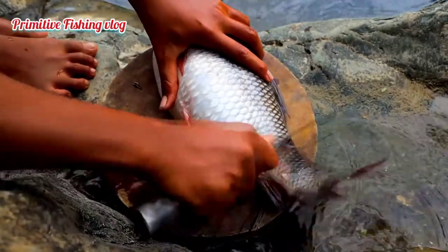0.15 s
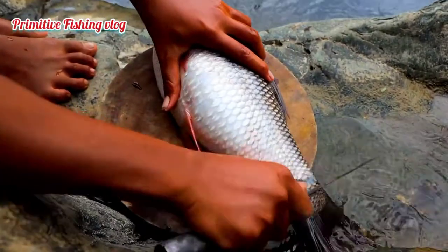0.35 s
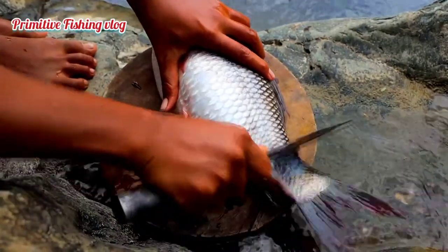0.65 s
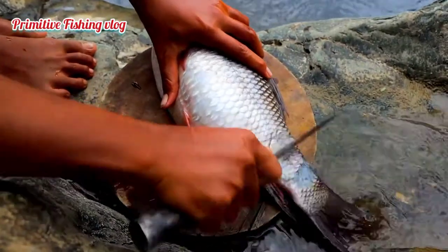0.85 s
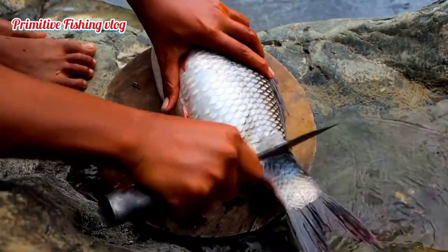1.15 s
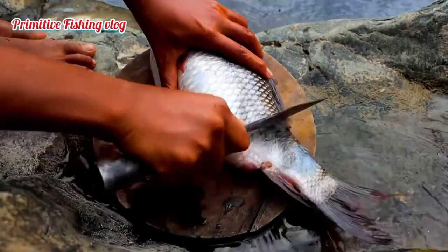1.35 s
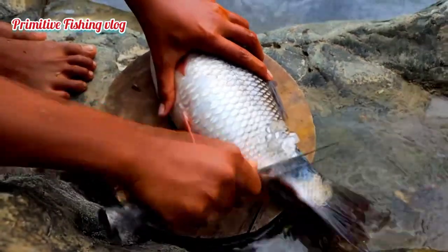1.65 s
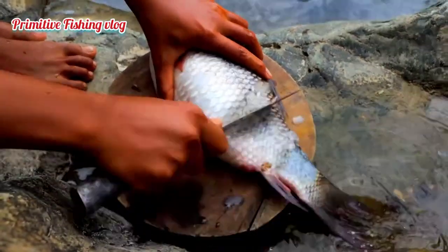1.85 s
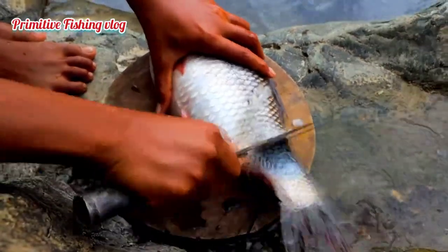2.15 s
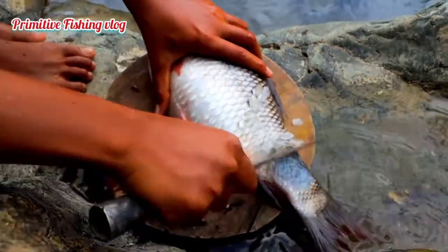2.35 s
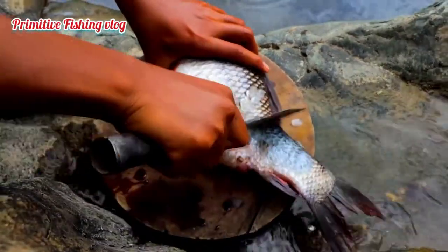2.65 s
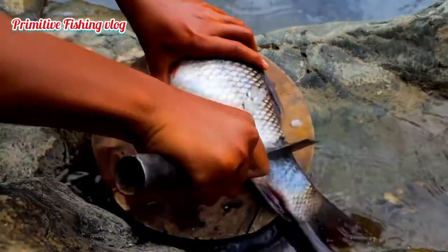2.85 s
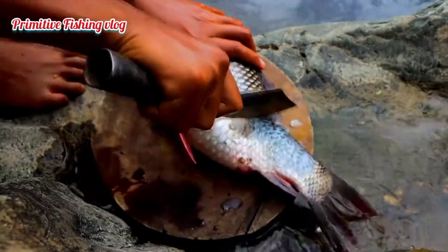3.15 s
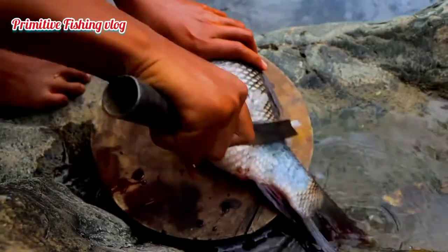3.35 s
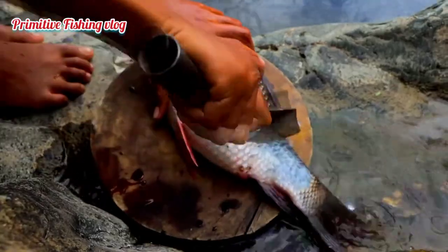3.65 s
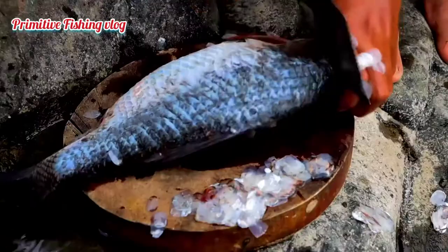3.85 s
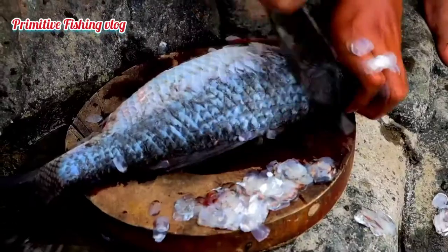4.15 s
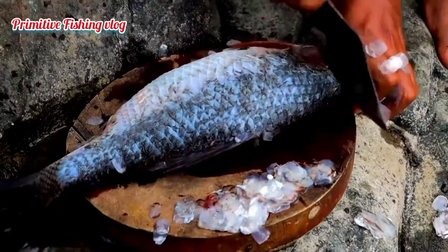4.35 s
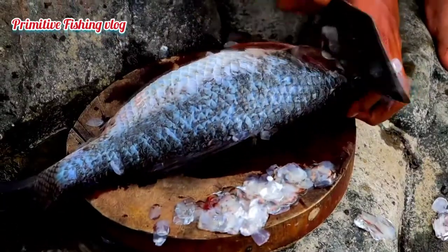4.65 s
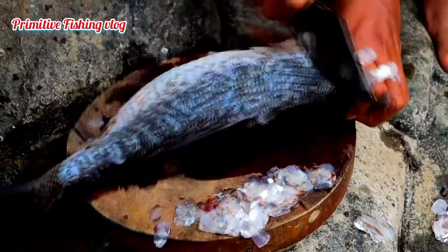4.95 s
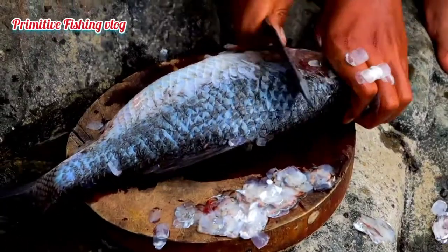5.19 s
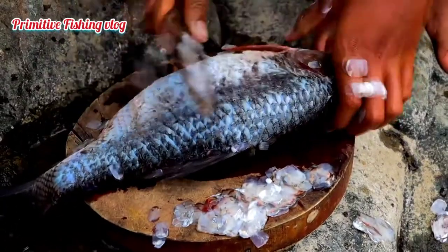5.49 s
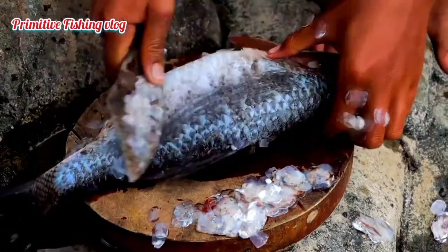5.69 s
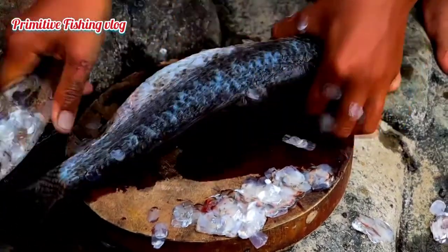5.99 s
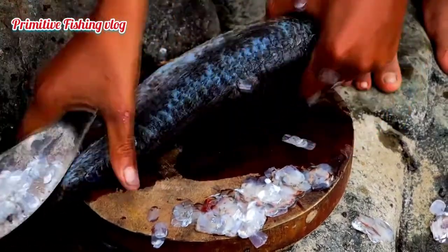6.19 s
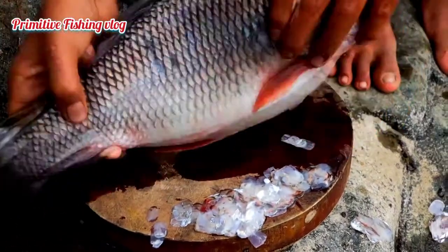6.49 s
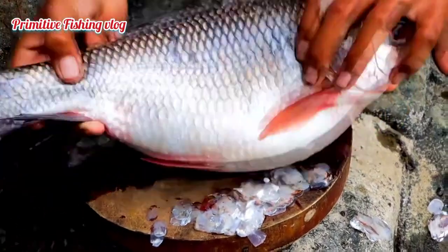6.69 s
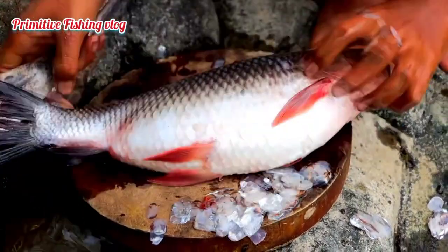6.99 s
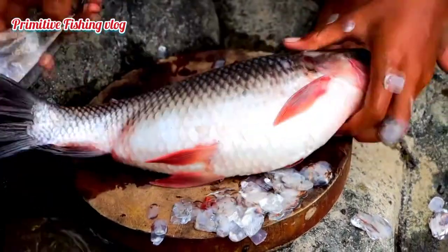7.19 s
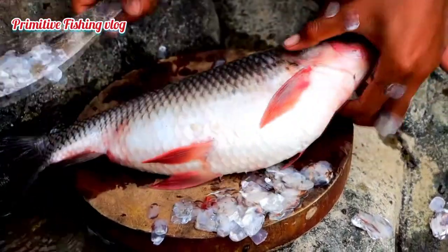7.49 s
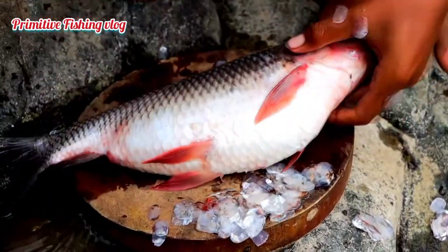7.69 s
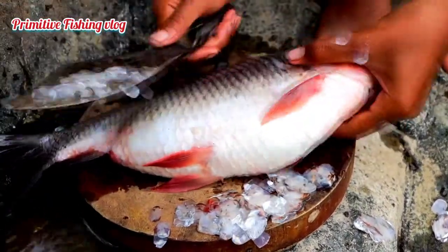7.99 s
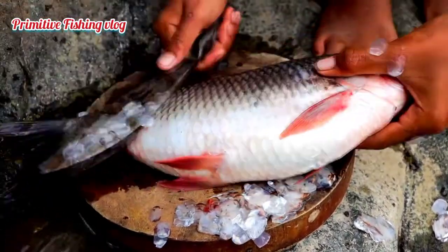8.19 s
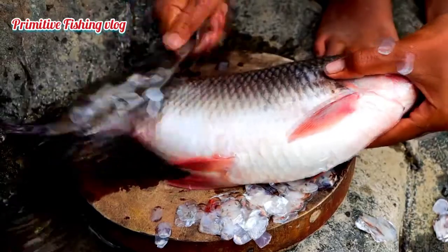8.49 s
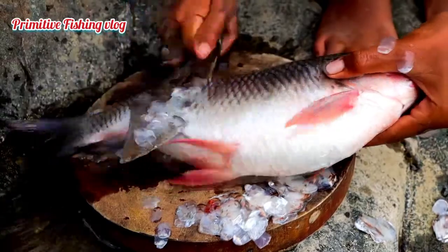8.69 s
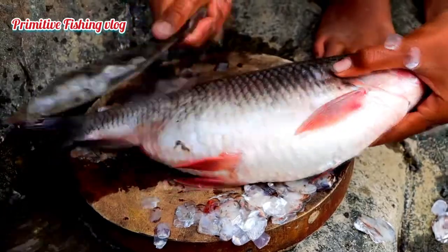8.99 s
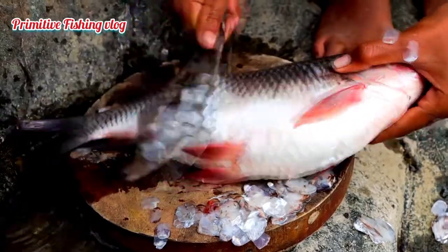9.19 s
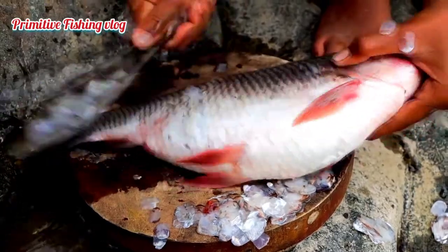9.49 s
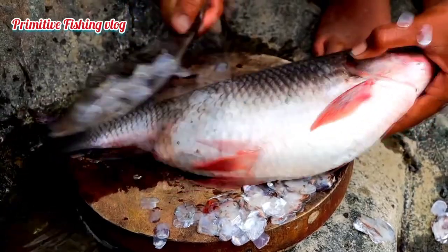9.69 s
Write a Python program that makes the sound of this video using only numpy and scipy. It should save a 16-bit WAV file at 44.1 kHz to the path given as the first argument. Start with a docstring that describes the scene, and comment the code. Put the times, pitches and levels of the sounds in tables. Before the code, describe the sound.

Close to the microphone, a knife scrapes a wet fish on a wooden board outdoors: brief, gritty, irregular rasps with a faint steely ring, crisp scale snaps and occasional hard clacks. Scraping stops around five seconds, leaving birdsong and stream, with small knocks near seven. A loud crack restarts the work after eight seconds. A distant bird whistles with echo; soft wind rumbles early on.

```python
"""Outdoors by a stream, a steel cleaver scrapes the scales off a large fish on a wooden board.
The edge rubs over wet skin (clumpy noise that also sets the steel ringing), scales snap loose (short
noise bursts), the blade knocks and rings (noise cracks and fading sines). Two birds sing gliding whistles,
one among echoing trees, one close by; water murmurs and wind buffets the microphone (shaped noise, bubbles).
Practically mono, with slight treble width added."""
import sys
import numpy as np
from scipy import signal
from scipy.fft import rfft, irfft, next_fast_len
from scipy.io import wavfile
from scipy.ndimage import uniform_filter1d, map_coordinates

SR = 44100
rng = np.random.default_rng(int(sys.argv[2]) if len(sys.argv) > 2 else 0)


def dump(signal):
    """Clip the signal to [-1, 1] and save it as 16-bit WAV at the path in sys.argv[1]."""
    limited = np.clip(np.atleast_2d(signal).T, -1, 1)
    pcm = np.round(limited * 32767).astype(np.int16)
    wavfile.write(sys.argv[1], SR, pcm)


N = 433944  # length of the scene in samples


def amp(db):
    """Turns decibels into a plain multiplier."""
    return 10 ** (np.asarray(db) / 20)


def unit(x):
    """Scales a sound to an rms of 1."""
    return x / np.sqrt(np.mean(x ** 2) + 1e-20)


def along(points, hz):
    """Reads a curve of (frequency [Hz], value) points on a log frequency axis."""
    f, v = np.transpose(points)
    return np.interp(np.log(hz + 1), np.log(f + 1), v)


def curves(rows):
    """One value per sample for each column after the time."""
    s, *cols = np.transpose(rows)
    return [np.interp(np.arange(N) / SR, s, c) for c in cols]


def wobble(rate):
    """A smooth random curve through `rate` random points a second."""
    points = rng.standard_normal(int(N * rate / SR) + 4)
    return map_coordinates(points, [np.arange(N) * rate / SR])


def filtered(x, response):
    """Multiplies the spectrum of x by a response, given as a function of frequency."""
    m = next_fast_len(N + SR // 2)
    return irfft(rfft(x, m) * response(np.fft.rfftfreq(m, 1 / SR)), m)[..., :N]


def coloured(x, spectrum):
    """Shapes x by a (frequency [Hz], level [dB]) spectrum, scaled so that white noise keeps its rms."""
    power_gain = amp(2 * along(spectrum, np.linspace(0, SR / 2, num=4096)))
    norm = np.sqrt(np.mean(power_gain))
    return filtered(x, lambda hz: amp(along(spectrum, hz)) / norm)


def add(track, s, sound):
    """Mixes a sound into a track at a time in seconds."""
    part = track[max(round(s * SR), 0):][:len(sound)]
    part += sound[:len(part)]


def tail(t60, late_t60, late_db):
    """A randomly drawn echo tail: a quick, lumpy part and a long part at its own level."""
    t = np.arange(SR // 3) / SR
    lumps = amp(5 * np.interp(t * 150, np.arange(60), rng.standard_normal(60)))
    quick, late = lumps * amp(-60 * t / t60), amp(late_db - 60 * t / late_t60)
    out = (quick + late) * rng.standard_normal(len(t))
    return out / np.linalg.norm(out)


# Strokes of the edge over the skin, levels before the rasp and steel are shaped and mixed:
# (time [s], nominal length [s], level [dB], how much it rings the steel [0-1])
STROKES = [(0.1, .03, -45, 1), (0.191, 0.04, -43.5, .3), (.228, 0.018, -34.5, 0.7), (0.352, 0.047, -46, 1),
           (0.491, 0.038, -43.5, 1), (.65, .1, -56, .2), (.764, 0.046, -44.5, .5), (0.941, 0.037, -47.5, 1),
           (1.015, 0.097, -55.5, 0.6), (1.314, .054, -50.5, .1), (1.368, .036, -50, 0.26),
           (1.393, 0.02, -35.5, 0.26), (1.573, .056, -56, .5), (1.7, .03, -53, .3), (1.733, 0.05, -53, 0.2),
           (1.773, 0.062, -45.5, .1), (1.836, 0.043, -36.5, 0.62), (1.974, .068, -49, .6),
           (2.102, .024, -44, 1), (2.13, 0.1, -54.5, 0.55), (2.292, .041, -46, 0.3),
           (2.563, .036, -47.5, 0.5), (2.587, 0.067, -56, .1), (2.683, 0.084, -50.5, 0),
           (2.877, 0.025, -51.5, .4), (3.015, 0.028, -45, 0.5), (3.127, 0.028, -51.5, 0),
           (3.439, .12, -49.5, 0.2), (3.616, 0.019, -45.5, 0.6), (3.689, 0.04, -49, 1),
           (3.841, .09, -51, .2), (3.912, 0.02, -47, 0.5), (4.18, 0.054, -48, .3), (4.235, 0.069, -45, .4),
           (4.274, .02, -32.5, .6), (4.296, 0.023, -43, 0.44), (4.57, 0.026, -55, 0.5),
           (4.596, 0.033, -43.5, 0), (4.624, 0.049, -54.5, 0.2), (4.649, 0.012, -34.5, 0.5),
           (4.788, 0.037, -41, 0.26), (4.896, .063, -39.5, 0), (5.31, 0.13, -60.5, 0.36),
           (5.693, 0.23, -55.5, 0.14), (6.772, 0.072, -55, 0.32), (7.162, 0.073, -58.5, .15),
           (8.453, .017, -42, .3), (8.531, 0.07, -52, .2), (8.713, 0.017, -38.5, 0.57),
           (8.787, 0.045, -54, .2), (8.938, 0.016, -32.5, 0.5), (9.003, 0.044, -47.5, 0),
           (9.162, 0.024, -36.5, 0.35), (9.231, 0.023, -46, 0), (9.369, 0.014, -29.5, 0.06),
           (9.407, 0.066, -52, .4), (9.605, 0.017, -29.5, 0), (9.656, .048, -53, .2)]
# While the knife is at work it also brushes the skin lightly: (start [s], end [s])
WORK_SPANS = [(0, 4.98), (8.36, 9.84)]
DRAG_S, DRAG_DB = 0.028, -14.5  # the edge drags on after each stroke; level relative to the stroke
BRUSH_DB, BRUSH_SPREAD_DB, BRUSH_S = -59, 3.2, .06  # middle level, spread either way, middle length


def strokes(count):
    """Every stroke, the drag that follows it, and light brushes at chance moments of work."""
    drags = [(s + .8 * length, DRAG_S, db + DRAG_DB, .3 * share) for s, length, db, share in STROKES]
    draw = rng.random((count, 4)) * [N / SR, 1, 1, 1]
    brushes = []
    for s, a, b, c in draw:
        if any(begin < s < end - .1 for begin, end in WORK_SPANS):
            brush_db = BRUSH_DB + BRUSH_SPREAD_DB * (2 * b - 1)
            brushes.append((s, BRUSH_S * (.5 + a), brush_db, .5 * c))
    return STROKES + drags + brushes


def grit(rate, spread_db):
    """Tiny slips of uneven size over a finer hiss, in clumps; each ridge favours its own band."""
    clumps = amp(2.1 * wobble(70) + 3.86 * wobble(250))
    slip_times = rng.random(N) < rate / SR  # `rate` slips a second on average
    slips = slip_times * amp(spread_db * rng.exponential(size=N)) * rng.standard_normal(N)
    z = signal.stft(clumps * (rng.standard_normal(N) + 0.76 * unit(slips)), nperseg=128)[2]
    bands = uniform_filter1d(rng.standard_normal(z.shape), size=8, axis=0)
    bands = uniform_filter1d(bands, size=2, axis=1)
    return unit(signal.istft(z * amp(3.0 * unit(bands)), nperseg=128)[1][:N])


# The blade's own tones (modes); contact changes their balance and can shorten their ring:
# (frequency [Hz], relative level [dB], time for the free blade to fade by 60 dB [s])
BLADE_MODES = [(895, -5, 0.075), (1796, -2, 0.062), (2630, -10, 0.039), (2958, 1.5, 0.039),
               (3565, -8, 0.035), (4200, -10, 0.025), (4870, -17, 0.033), (5660, 5.5, 0.018),
               (6700, 0.5, 0.035), (7110, -6.5, 0.031), (8140, -15, .03), (9770, -8.5, 0.038),
               (10110, 0.5, 0.027), (11160, -8, 0.023), (12700, -10, 0.016), (14880, -6, .03)]
FLESH_DAMPING = .75  # ring time of the blade pressed on flesh, as a share of the free blade's


def ringing(weights_db, lean_db):
    """The steel's answer to one push, damped by the flesh; where the edge touches sets each mode's strength."""
    t = np.arange(SR // 40) / SR
    ring = np.zeros(len(t))
    for (hz, db, t60), weight_db in zip(BLADE_MODES, weights_db):
        mode_db = db + weight_db + lean_db * np.log2(hz / 6000)
        ring += amp(mode_db - 60 * t / (FLESH_DAMPING * t60)) * np.sin(2 * np.pi * hz * t)
    return ring / np.linalg.norm(ring)


# Tone colour of the scaly skin, for the rasp, the rustle and the short cracks:
# (frequency [Hz], relative level [dB])
SKIN_SPECTRUM = [(410, -46), (700, -9.5), (1680, -5.5), (1910, -7), (3900, -0.5), (4580, -3), (5430, -2.5),
                 (15200, -16), (16500, -8)]
# Slow course of the background: (time [s], stream level [dB], rustle of wet hands level [dB]), before mixing
STREAM_AND_HANDS = [(0.0, -53.5, -52), (1.67, -54.5, -58), (1.86, -53.5, -52), (4.27, -55, -59),
                    (9.84, -56, -58.5)]
BRIGHT_DB, BRIGHT_PER_SHARE_DB = 2.5, 5.5  # strokes that ring the steel also rasp higher
STEEL_DB = 7.5  # the singing steel against the rasp


def rubbing():
    """Each stroke swells and fades; it rasps on the scales and sets the steel singing."""
    force = grit(rate=730, spread_db=1.5)
    rows = strokes(count=36)
    touch_db = 4.2 * rng.standard_normal((len(rows), len(BLADE_MODES)))
    dull, bright, steel = np.zeros((3, N))
    for (s, length, db, share), weights_db in zip(rows, touch_db):
        bright_db = BRIGHT_DB + BRIGHT_PER_SHARE_DB * share
        steel_share = .7 * np.clip(share, 0, 1) ** 3  # share of the push's power
        rasp_gain = np.sqrt(1 - steel_share)
        start = max(s - 0.2 * length, 0)
        push = force[round(start * SR):][:int(1.3 * length * SR)]
        push = amp(db) * unit(push) * signal.windows.tukey(len(push), .6)
        add(dull, start, rasp_gain * amp(-.4 * bright_db) * push)
        add(bright, start, rasp_gain * amp(1.58 * bright_db) * push)
        ring = ringing(weights_db, max(2.0 + 0.34 * bright_db, 0))
        add(steel, start, np.sqrt(steel_share) * signal.fftconvolve(push, ring))
    upper = lambda hz: 1 / (1 + (8000 / (hz + 1)) ** 4)  # finer ridges rasp higher
    rasp = dull + filtered(bright - dull, upper)
    # wet fingers shifting on the skin
    rustle_db = curves(STREAM_AND_HANDS)[1] - 4.0 + 2.5 * wobble(12)
    rustle = amp(rustle_db) * grit(rate=62, spread_db=3.0)
    return coloured(rasp + rustle, SKIN_SPECTRUM) + amp(STEEL_DB) * steel


# Short cracks: scales snapping loose, and the sharp onset of blade knocks; levels before shaping and mixing:
# (time [s], level [dB], pitch [Hz], thud relative to that level [dB])
SHORT_CRACKS = [(.1068, -23, 6710, -36), (.211, -24, 2640, -34), (.227, -18, 5670, -24.5),
                (.2934, -28, 5740, -14), (0.7805, -14.5, 5900, -26.5), (.8338, -17.5, 3500, -31),
                (1.1338, -28, 2520, -25), (1.405, -12, 5430, -42), (1.7419, -21, 4400, -33),
                (1.815, -22.5, 5400, -23), (1.8456, -12, 10000, -23), (2.0625, -8, 3300, -36),
                (2.3078, -25, 5500, -23), (2.3433, -27, 5000, -15), (2.6994, -25.5, 4940, -22),
                (3.0075, -25.5, 5530, -25), (3.1338, -28, 3000, -17), (3.6226, -20, 4370, -25),
                (3.924, -11, 3700, -26), (4.2756, -13, 4580, -20), (4.2809, -5.5, 6850, -28),
                (4.595, -24.5, 5260, -18), (4.6539, -14.5, 5070, -24.5), (4.793, -27, 2500, -14),
                (4.8947, -32, 5660, -9), (4.9425, -21, 5160, -20), (5.09, -28, 3500, -26),
                (5.1746, -28, 3500, -26), (7.0469, -2, 2400, -41), (7.0912, -12.5, 2900, -30.5),
                (7.1364, -21.5, 2930, -27), (8.35, 5, 3800, -45), (8.6173, -29.5, 4930, -16),
                (8.716, -13.5, 2870, -28), (8.9435, -5, 3930, -36.5), (9.1648, -11, 3900, -30),
                (9.249, -27, 3500, -18), (9.3765, -6, 3400, -34), (9.448, -22, 3000, -28),
                (9.6087, -8, 3790, -30.5), (9.836, -7, 2600, -29.5)]
# Each stroke also frees a small scale: greatest level over the stroke's, middle pitch, thud
SMALL_SNAP_DB, SMALL_SNAP_HZ, SMALL_THUD_DB = 14.5, 5500, -22


def snapping():
    """A scale letting go, or the onset of a knock, is a pitched burst of noise with a thud in the flesh."""
    cracks, thuds, t = np.zeros(N), np.zeros(N), np.arange(SR // 16) / SR
    small = []
    for (s, length, db, _), (a, b, c) in zip(STROKES, rng.random((len(STROKES), 3))):
        pitch = SMALL_SNAP_HZ * 2 ** (2 * c - 1)  # up to an octave either way
        small.append((s + a * length, db + SMALL_SNAP_DB - 8 * b, pitch, SMALL_THUD_DB))
    for s, db, hz, thud_db in SHORT_CRACKS + small:
        fade = amp(-60 * t / .013) + amp(-21.5 - 60 * t / 0.058)  # quick, then a fainter slow part
        burst = amp(db - 8.5) * (1 - np.exp(-t / 0.00067)) * fade * rng.standard_normal(len(t))
        pitched = signal.lfilter(*signal.iirpeak(np.clip(hz, 2000, 15000), 1.6, SR), burst)
        add(cracks, s, 0.59 * burst + 1.02 * pitched)
        thud_shape = amp(db + thud_db) * (1 - np.exp(-t / 0.0026)) * amp(-60 * t / 0.039)
        add(thuds, s, thud_shape * rng.standard_normal(len(t)))
    flesh = [(60, -26), (150, -1.5), (500, 5), (1200, -14), (3000, -47)]  # (frequency [Hz], level [dB])
    return amp(1.5) * coloured(cracks, SKIN_SPECTRUM) + amp(4.0) * coloured(thuds, flesh)


# The blade knocking on bone, board or stone: (time [s], level [dB], lowest mode relative to it [dB],
# hardness [dB per octave], ring time [1 = free blade], crack relative to the level [dB])
BLADE_KNOCKS = [(0.0014, -33, 1.5, -20, 1, -18), (0.0173, -20, -13, -17, 1, -21),
                (0.0417, -23.5, -11, -17, 1, -21), (0.0543, -30.5, -4.5, -20, 1, -18),
                (0.4381, -7.5, -26.5, -12.5, 0.67, -15.5), (0.98, -8.5, -17, -15, 0.46, -21),
                (1.8354, -17, -2, -7, 0.47, -20), (2.0636, -5, -22, -12.5, 0.49, -18.5),
                (7.048, -25, -3, -20, 0.45, 1.5), (7.093, -24, -3.5, -14, 1, 4),
                (7.1367, -23.5, -10, -11, 0.99, -14), (8.3508, 0.5, -32, -9, 0.95, -10)]


def knocks():
    """A blow cracks and rings the modes, the high ones more when the contact is hard."""
    out, t = np.zeros(N), np.arange(SR // 7) / SR
    band = signal.butter(2, [1000, 5000], "bandpass", fs=SR)
    for s, db, low_db, hardness_db, freedom, crack_db in BLADE_KNOCKS:
        crack = amp(db + crack_db - 60 * t / 0.029) * rng.standard_normal(len(t))
        add(out, s, signal.lfilter(*band, crack))
        for k, (hz, level_db, t60) in enumerate(BLADE_MODES):
            if k == 0:
                tone_db = low_db
            else:
                tone_db = level_db + hardness_db * np.log2(hz / 1776) + rng.normal(0, 0.96)
            ring = amp(db + tone_db - 60 * t / (max(freedom, .2) * t60)) * (1 - np.exp(-t / 0.00037))
            add(out, s, ring * np.sin(2 * np.pi * (hz * t + rng.random())))
    return out


# Bird notes by name: (loudest moment after the start [s], glide as (time from start [s], pitch [Hz]))
BIRD_NOTES = { "low": (.021, [(0, 1750), (.007, 1600), (.021, 1930), (.03, 1750), (.037, 1480)]),
              "rise": (.028, [(0, 1600), (.007, 1700), (.025, 2505), (.038, 2502)]),
              "high": (.04, [(0, 3950), (.014, 3680), (.04, 3360), (.07, 3220), (.09, 3380)]),
              "fall": (0.031, [(0, 3020), (.056, 2004), (.078, 1850)]), "drop": (.03, [(0, 3410),
              (.022, 2800), (.036, 2400), (.052, 2400)]), "lead": (0.013, [(0, 2400), (.026, 2910)]),
              "plunge": (0.021, [(0, 3450), (.015, 2480), (.028, 1760), (.036, 1750)]),
              "arch": (0.026, [(0, 1320), (.02, 2570), (.044, 1220)]), "lift": (0.035, [(0, 2490),
              (.028, 3420), (.065, 3795)]), "flat": (0.056, [(0, 2596), (.045, 2575), (.11, 2470)]),
              "bend": (.07, [(0, 2620), (.06, 2560), (.11, 2600), (.145, 2900), (.175, 3250)]),
              "chup": (.014, [(0, 2260), (.008, 1875), (.022, 1600)]), "trill": (.048, [(0, 2400),
              (.008, 2480), (.017, 2337), (.024, 3375), (.03, 3580), (.056, 2450), (.06, 2350)]),
              "long trill": (.048, [(0, 2650), (.018, 2330), (.025, 3390), (.031, 3480), (.055, 2800),
              (.07, 2250)]), }
START_DB, END_DB = -13, -13.5  # a note swells from here to its loudest moment and fades to there
FLUTTER_DB, FLUTTERS_PER_S = 1.6, 80  # the voice is unsteady in level


def sing(song, echo_db, t60):
    """A whistle: one gliding sine with a faint octave; each note gets its own randomly drawn echo tail."""
    out = np.zeros(N)
    for s, name, db in song:
        loudest_s, (at, hz) = BIRD_NOTES[name][0], np.transpose(BIRD_NOTES[name][1])
        t = np.arange(int(at[-1] * SR)) / SR
        detune = 1 + 0.0083 * rng.standard_normal()
        glide = uniform_filter1d(np.interp(t, at, hz), size=150) * detune
        phase = 2 * np.pi * np.cumsum(glide) / SR
        swell_db = np.interp(t, [0, loudest_s, at[-1]], [START_DB, 0, END_DB])
        flutter = np.interp(t * FLUTTERS_PER_S, np.arange(16), rng.standard_normal(16))
        gain = amp(db + 5.5 + swell_db + FLUTTER_DB * flutter) * signal.windows.tukey(len(t), .15)
        note = gain * (np.sin(phase) + amp(-40) * np.sin(2 * phase))
        add(out, s, note)
        add(out, s, amp(echo_db) * signal.fftconvolve(note, tail(t60, 0.74, late_db=-30.0)))
    return out


# The far bird's refrain is a fall, four low-and-rise pairs and a high note: time of each first pair [s]
REFRAIN_TIMES = [.592, 6.655]
FALL_LEADS_S, PAIR_S, RISE_AFTER_S, HIGH_AFTER_S = 0.441, .1555, .047, 0.6563
FALL_DB, LOW_DB, RISE_DB, HIGH_DB = -23.5, -32, -25.5, -32  # relative levels of the notes
# The far bird's single notes between refrains: (time [s], note name, relative level [dB])
FAR_SINGLE_NOTES = [(3.81, "flat", -43), (4.06, "lead", -37), (4.09, "plunge", -30), (4.415, "drop", -25),
                    (4.761, "drop", -26), (5.085, "arch", -31), (5.173, "arch", -29.5),
                    (5.259, "arch", -30.5), (5.37, "lift", -36.5), (5.735, "bend", -47.5),
                    (6.028, "chup", -48), (6.065, "chup", -48)]
# The near bird trills in twos, the second note longer; levels are relative
TRILL_S, TWO_S, SECOND_AFTER_S, FIRST_DB, SECOND_DB = 9.297, 0.1607, 0.057, -31.5, -31


def birds():
    """The far bird beats with its bounce off the water and returns from the far bank; the near is almost dry."""
    song = list(FAR_SINGLE_NOTES)
    for s in REFRAIN_TIMES:
        song += [(s - FALL_LEADS_S, "fall", FALL_DB), (s + HIGH_AFTER_S, "high", HIGH_DB)]
        for k in range(4):
            pair_s = s + k * PAIR_S
            song += [(pair_s, "low", LOW_DB), (pair_s + RISE_AFTER_S, "rise", RISE_DB)]
    far = sing(song, echo_db=-2.5, t60=0.12)
    water_bounce = amp(-8.5) * np.roll(far, round(.007 * SR))
    bank_echo = amp(-25) * np.roll(far, round(0.037 * SR))
    far = far + water_bounce + bank_echo
    trills = []
    for k in range(7):  # three twos and one more first note
        two, second = divmod(k, 2)
        name, db = [("trill", FIRST_DB), ("long trill", SECOND_DB)][second]
        trills.append((TRILL_S + two * TWO_S + second * SECOND_AFTER_S, name, db))
    return far + sing(trills, echo_db=-10, t60=0.048)


def rush(spectrum, patchy_db):
    """Noise of rms 1 with patches of random gain, like moving water or air."""
    z = signal.stft(rng.standard_normal(N + 512), nperseg=256)[2]
    field = uniform_filter1d(rng.standard_normal(z.shape), size=3, axis=0)
    field = uniform_filter1d(field, size=12, axis=1)
    patchy = signal.istft(z * amp(patchy_db * unit(field)), nperseg=256)[1][:N]
    return unit(coloured(patchy, spectrum))


def bubbles(count, db):
    """Air pockets in the shallows: short tones that rise as they fade."""
    draw = rng.random((count, 3))
    hz, size = 250 * 6 ** draw[:, 1:2], amp(db + 9.1 * draw[:, 2:] ** 3)
    t = np.arange(SR // 25) / SR
    swell = size * hz * t * np.exp(-hz * t / 2.87)
    blip = swell * np.sin(2 * np.pi * hz * t * (1 + .012 * hz * t))
    where = (draw[:, :1] * N).astype(int) + np.arange(len(t))
    return np.bincount(where.ravel(), blip.ravel(), minlength=N)[:N]


# Wind on the microphone, before mixing: (time [s], level [dB])
WIND_LEVEL = [(0.0, -50.5), (0.63, -61.5), (1.01, -42), (1.37, -57), (1.53, -38), (2.3, -47.5), (2.35, -38),
              (2.63, -48), (3.2, -48), (3.26, -39.5), (3.67, -44), (3.75, -37.5), (3.89, -71),
              (7.37, -71.5), (9.15, -56), (9.32, -42.5), (9.45, -61), (9.84, -56)]
# Tone colour of the stream: (frequency [Hz], relative level [dB])
STREAM_SPECTRUM = [(76, -78), (130, -14.5), (322, -3.5), (577, -2), (692, -6), (780, -1.5), (1170, 1),
                   (1580, -3.5), (3830, -10), (7600, -28), (11800, -29.5), (16000, -45)]
# Tone colour of the wind's rumble: (frequency [Hz], relative level [dB])
RUMBLE_SPECTRUM = [(12, -25), (20, 5.5), (86, -0.5), (114, -6.5), (178, -22), (250, -34.5), (320, -32),
                   (550, -120)]


def outdoors():
    """The stream's murmur and bubbling and the wind's lumpy rumble; strong gusts reach higher."""
    wind_db, stream_db = curves(WIND_LEVEL)[0], curves(STREAM_AND_HANDS)[0]
    water = amp(stream_db + 3 + .7 * wobble(7)) * rush(STREAM_SPECTRUM, patchy_db=1.5)
    gust_db = 1.5 * wobble(7) + 3 * wobble(16)
    flutter = rush([(80, -40), (160, 2.5), (300, -10), (600, -29.5)], patchy_db=2.0)
    rumble = unit(amp(gust_db) * rush(RUMBLE_SPECTRUM, patchy_db=3.0))
    wind = rumble + amp(-26 + 1.35 * gust_db) * flutter
    return water + amp(stream_db) * bubbles(count=250, db=-8.5) + amp(wind_db + 0.8) * wind


# A little decorrelated treble makes the two channels differ; level by frequency:
# (frequency [Hz], level [dB])
STEREO_WIDTH = [(2000, -87), (4000, -45), (8000, -26), (14000, -22)]


def scene():
    """Practically mono, with slight treble width added."""
    knife = rubbing() + snapping() + knocks()
    decorrelated = signal.fftconvolve(knife, tail(0.017, .01, late_db=-44))[:N]
    side = filtered(decorrelated, lambda hz: amp(along(STEREO_WIDTH, hz)))
    mid = knife + birds() + outdoors()
    return np.array([mid + side, mid - side])


TOP_HZ = 15900  # nothing is kept from here up


def record(dry):
    """The loudest peaks saturate softly, then the sound is cut off at the band limit."""
    clipped = dry / (1 + np.abs(dry / .99) ** 8) ** (1 / 8)
    return filtered(clipped, lambda hz: hz < TOP_HZ)


dry = scene()
out = record(dry)
dump(out)
```